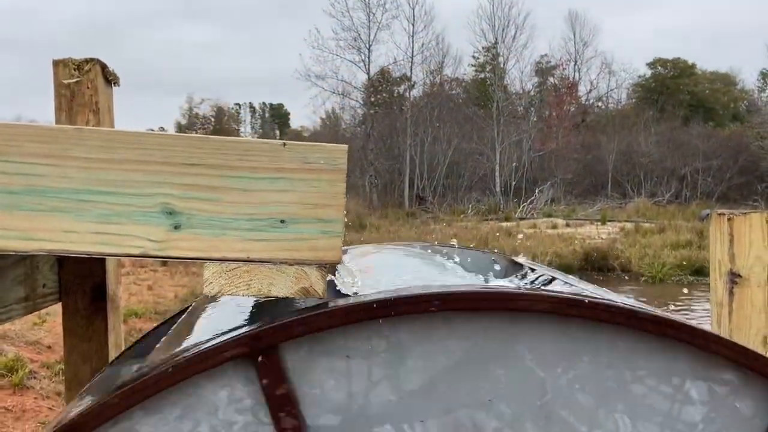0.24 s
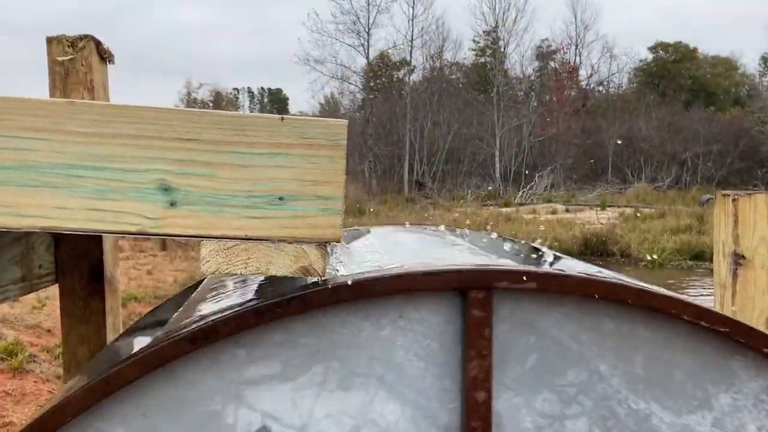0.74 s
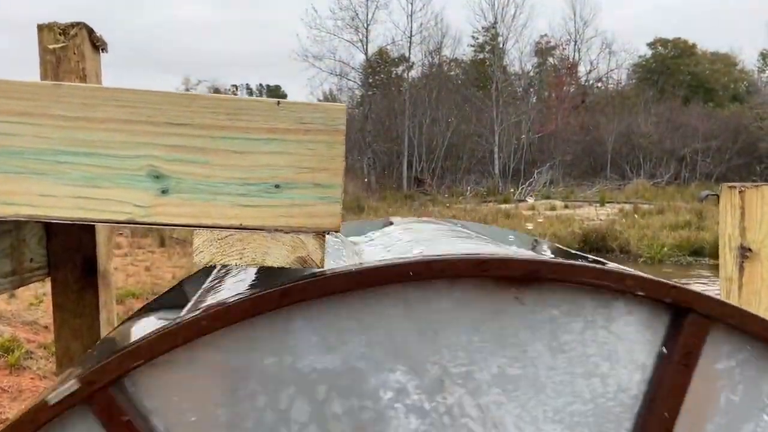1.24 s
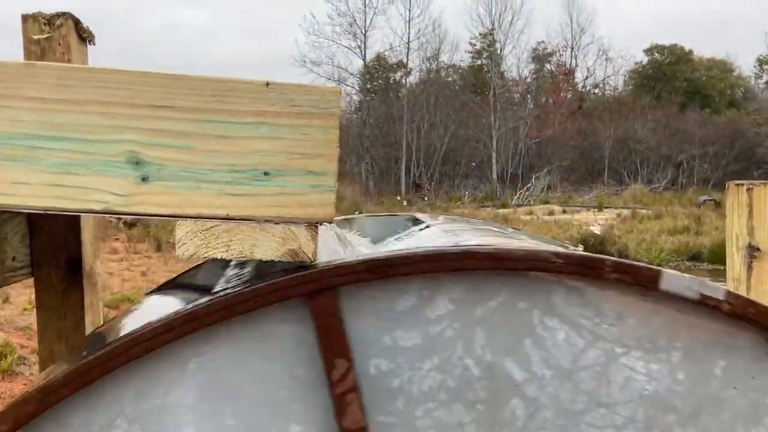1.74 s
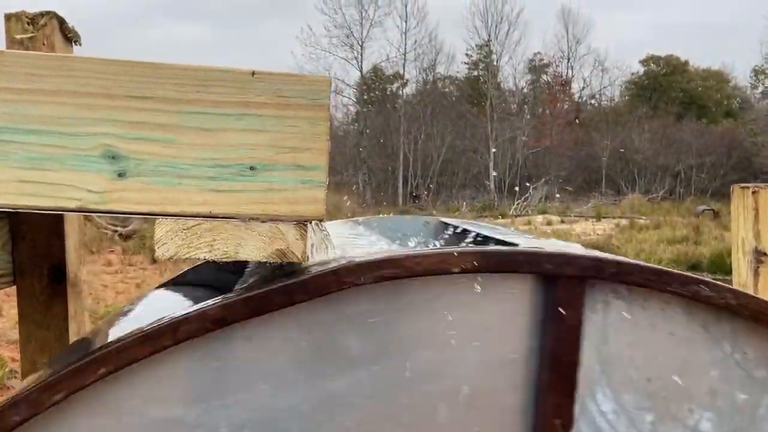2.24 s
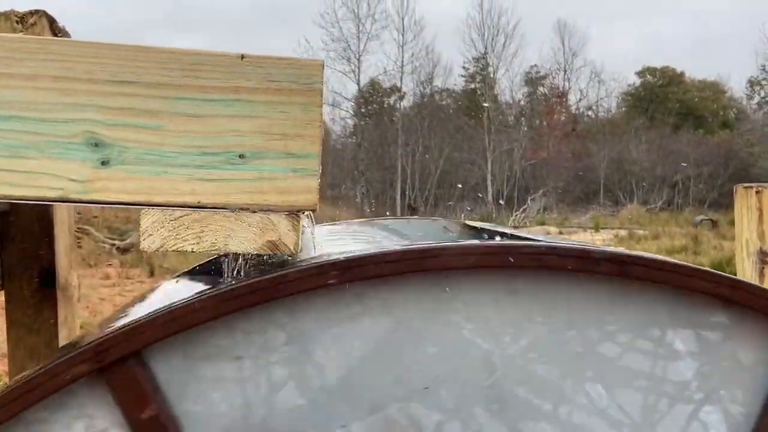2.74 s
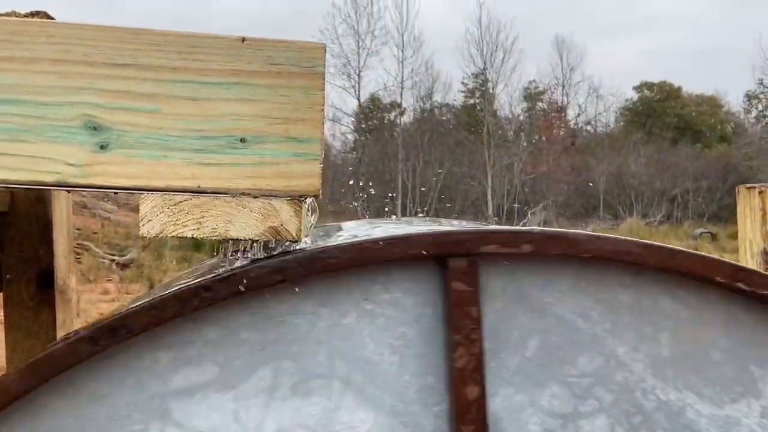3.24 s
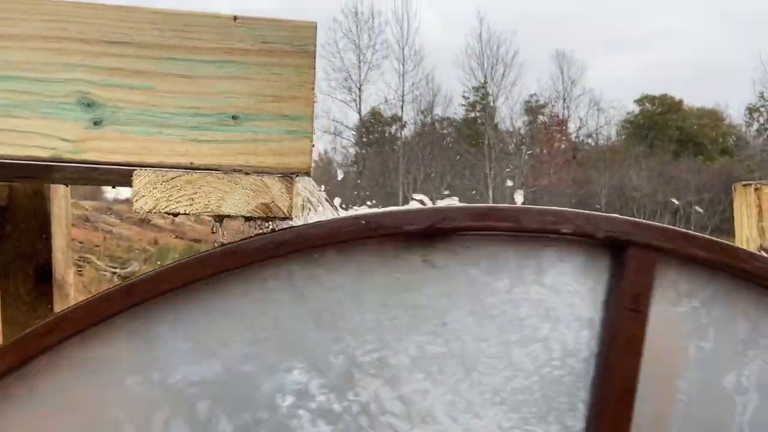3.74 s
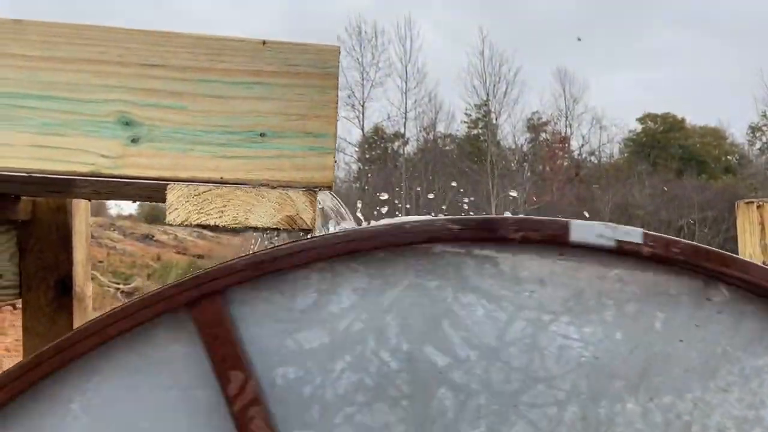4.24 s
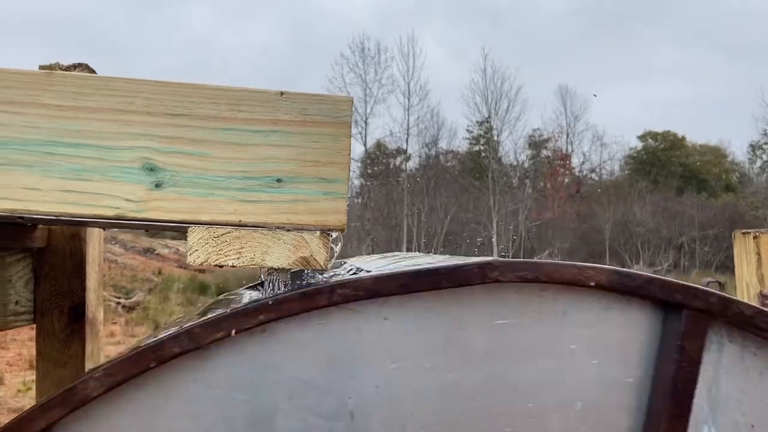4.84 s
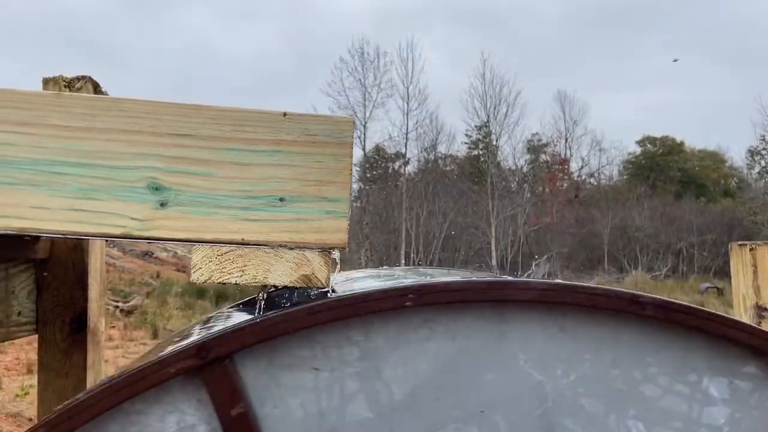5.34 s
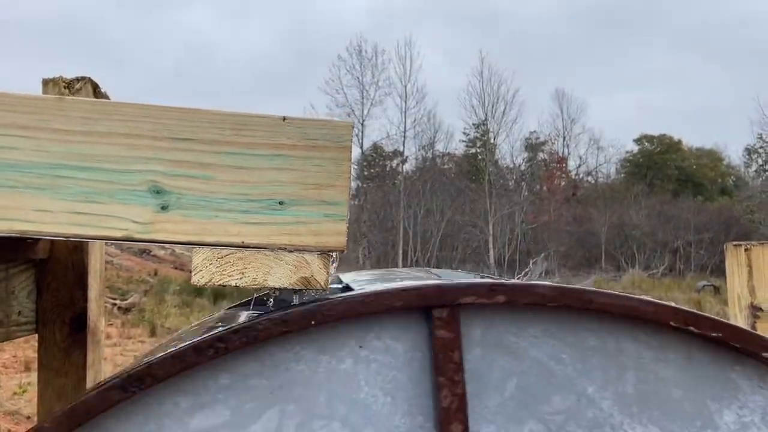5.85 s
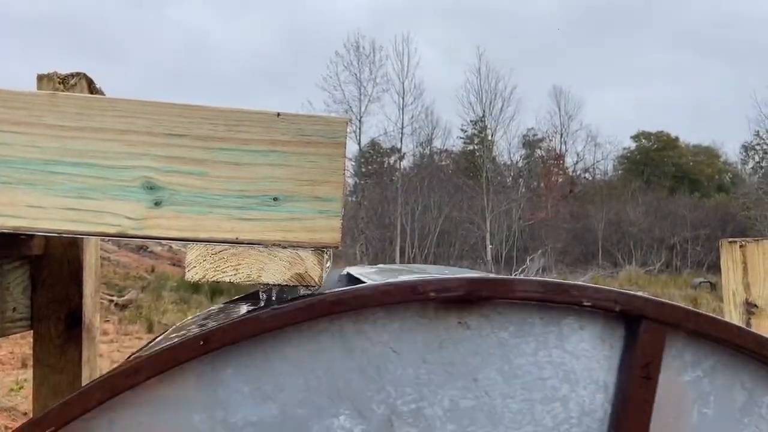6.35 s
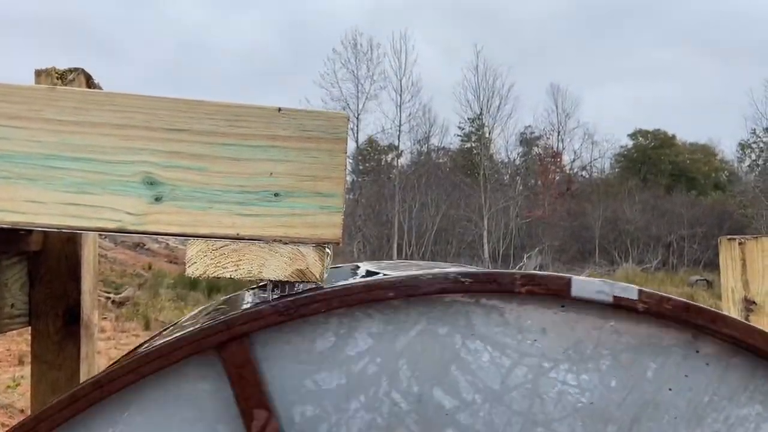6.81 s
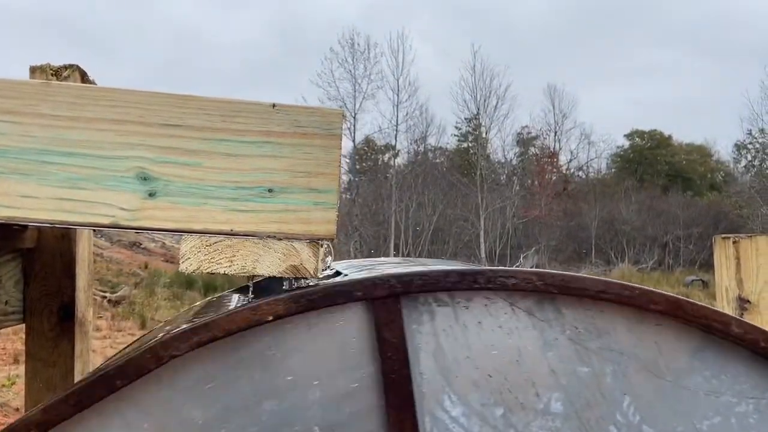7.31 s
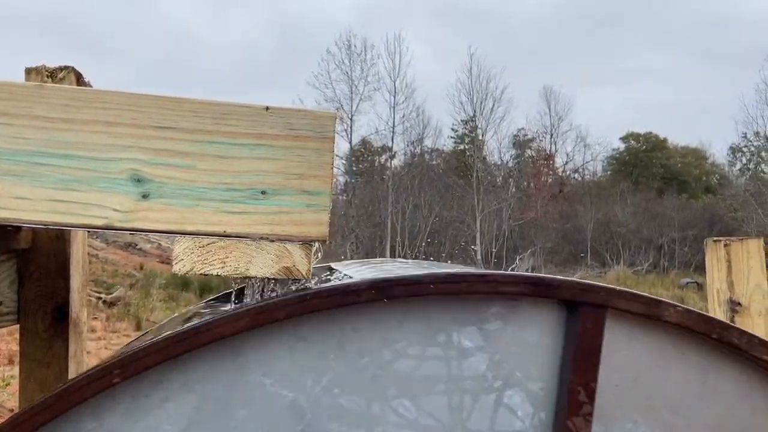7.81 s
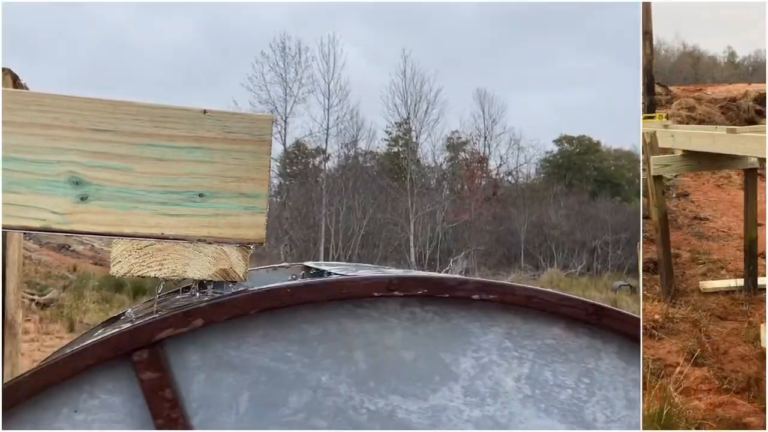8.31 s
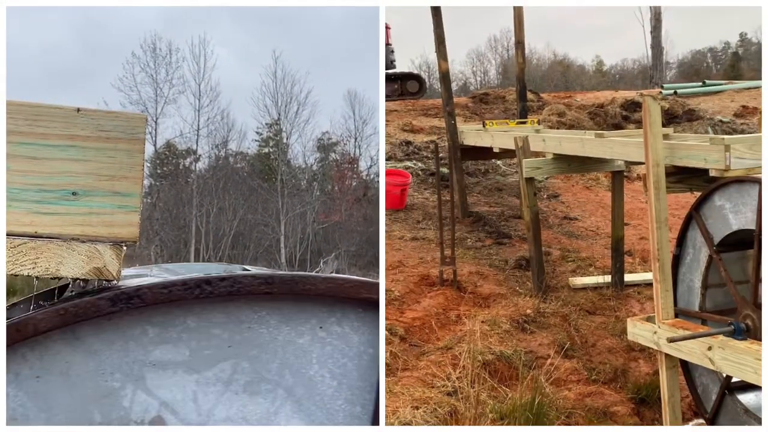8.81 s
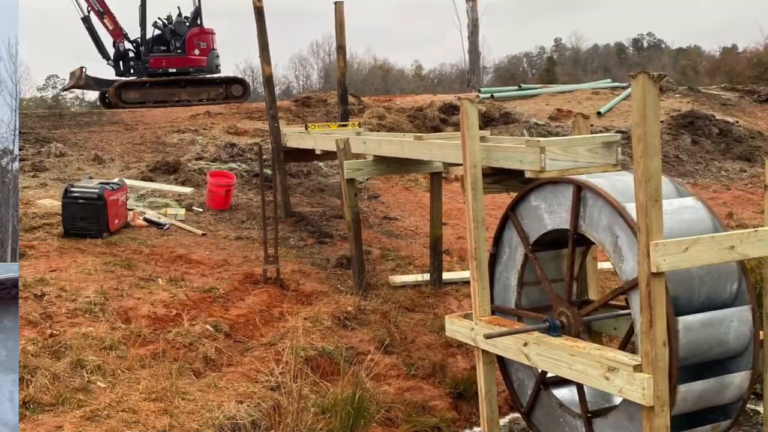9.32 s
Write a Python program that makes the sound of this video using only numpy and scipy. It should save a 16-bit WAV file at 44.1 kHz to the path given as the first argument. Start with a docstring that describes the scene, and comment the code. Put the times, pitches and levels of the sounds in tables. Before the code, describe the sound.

Outdoors, a small generator throbs and ticks at a distance while water rushes over a steel waterwheel right beside the microphones. It starts fairly quiet and keeps building. The wheel gives a quick double clack and a faint rubbing tone, then hollow gulps, sloshes and sharp splattering drops become more prominent over a fine hiss of spray, until a sudden stop.

```python
"""Steel waterwheel in a yard

Close to a wheel turning under a wooden flume: water rushes into the buckets, gulps air, thumps on the
sheet metal and throws drops that splat near the microphones. Across the yard a single-cylinder generator
hums and clatters. Heard on a small stereo pair, it all swells steadily, eases briefly and is cut off."""
import sys
import numpy as np
from scipy import signal
from scipy.fft import rfft, irfft, next_fast_len
from scipy.io import wavfile
from scipy.ndimage import map_coordinates

SR = 44100
rng = np.random.default_rng(int(sys.argv[2]) if len(sys.argv) > 2 else 0)


def log_audio(samples):
    """Write samples as a 16-bit WAV file to the path given in sys.argv[1]."""
    # one column per channel
    frames = np.atleast_2d(samples).T
    # limit to full scale, then quantise
    limited = np.clip(frames, -1, 1)
    pcm = np.round(limited * 32767).astype(np.int16)
    wavfile.write(sys.argv[1], SR, pcm)


N = 422032

# spectra of the low churn and the brighter rush under the flume: f/Hz, level/dB
CHURN_SPECTRUM = [(120, -25.5), (240, -4), (340, -2.5), (500, -6.5), (640, -8.5), (820, -10.5), (930, -3.5),
                  (1020, -8.5), (1120, -6.5), (1270, -14.5), (1650, -13.5), (2100, -12.5), (5000, -50.5)]
RUSH_SPECTRUM = [(600, 7.5), (1400, 4.5), (1850, 1.5), (2120, 2), (2700, -2), (3400, -1), (4100, -8.5),
                 (6000, -17.5), (15000, -47)]

def pouring(churn_db=-27, rush_db=-30):
    """The stream churns air into the buckets: large bubbles gurgle below a rush of small ones."""
    def between_discs(x):
        return unit(x + amp(-8) * echoed(x, t60=.08))  # reflections inside the steel wheel

    gurgle = bubbles(200, 1700, cycles=5, spread_db=2.5, rise=.04, count=7000, samples=1200)
    fizz = bubbles(1200, 6000, cycles=4, spread_db=2.4, rise=.03, count=18000, samples=200)
    fizz += amp(5) * noise()
    churn = unit(coloured(between_discs(gurgle + amp(11) * noise()), CHURN_SPECTRUM))
    rush = unit(coloured(between_discs(fizz), RUSH_SPECTRUM))
    surge = amp(churn_db + 1.026 * swell_db() + .7 * wobble(14))
    flutter = amp(rush_db + .88 * swell_db() + 1.23 * wobble(30))
    return surge * churn + flutter * rush


# spectrum of the filling buckets: f/Hz, level/dB
RUMBLE_SPECTRUM = [(18, -52), (32, -41.5), (52, -11), (85, -9.5), (130, -8.5), (200, -11.5), (270, -11),
                   (500, -41.5)]
# water slumping on a bucket's floor: t/s, relative level/dB, f/Hz
BUCKET_THUMPS = [(0.531, -33.5, 72), (0.86, -33, 84), (1.24, -29, 80), (1.502, -26.5, 72.6),
                 (2.137, -26, 81), (2.536, -25, 68), (2.699, -24.5, 74.5), (3.282, -25, 56),
                 (4.028, -22, 66), (4.188, -28, 88), (4.496, -22, 80), (4.715, -22.5, 71), (5.613, -17, 92),
                 (5.809, -26, 86), (6.23, -26.5, 81.4), (6.771, -20, 82), (7.118, -22, 92),
                 (7.607, -21, 94), (8.049, -23.5, 77)]
# air pockets closing in a bucket: t/s, relative level/dB, f/Hz, glide/share of f
AIR_GULPS = [(0.156, -23, 258, 0.11), (0.226, -23, 260, .05), (1.559, -24.5, 309, 0.13),
             (2.021, -22, 207, 0.14), (2.774, -27, 292, .2), (2.995, -23.5, 320, 0.24),
             (3.327, -24.5, 276, 0.22), (3.535, -24, 307, .25), (4.258, -19.5, 297, .1),
             (4.3, -20, 342, 0.29), (4.715, -23.5, 277, 0.019), (5.7, -15.5, 267, 0.12),
             (5.824, -17, 314, -0.098), (5.884, -12.5, 263, .25), (6.297, -14.5, 300, 0.028),
             (6.395, -10.5, 203, 0.055), (6.813, -7.5, 264, 0.07), (7.159, -19, 265, .1),
             (7.64, -18.5, 363, -0.075), (7.835, -19, 298, -0.079), (8.355, -17, 254, .1),
             (8.549, -11.5, 278, .11), (8.607, -16.5, 328, 0.08)]

def buckets(rumble_db=-30.5):
    """The sheet-metal buckets rumble as they fill, thump and gulp air; they radiate no deep bass."""
    lumps = noise() * amp(3 * wobble(14))
    rumble = amp(rumble_db + .62 * swell_db()) * unit(coloured(lumps, RUMBLE_SPECTRUM))
    thumps = plunges([(s, db, hz, 0) for s, db, hz in BUCKET_THUMPS], gain_db=-2.5, peak_s=.013, rough=.59)
    gulps = plunges(AIR_GULPS, gain_db=-1.5, peak_s=.007, rough=.45)
    return rumble + direct_only(coloured(thumps + gulps, [(28, -30), (48, -.5)]))


def plunges(events, gain_db, peak_s, rough):
    """Low, soft-edged resonances that swell and die within a few cycles."""
    track, t = np.zeros(N), np.arange(SR // 4) / SR
    age = t / peak_s
    for s, db, hz, glide in events:
        drift = np.interp(age, np.arange(40), rng.standard_normal(40))
        turns = hz * (t + glide * peak_s * (np.logaddexp(0, age - 2) - age / 2))
        envelope = amp(db + gain_db) * age * np.exp(1 - age)
        add(track, s, envelope * np.sin(2 * np.pi * turns + rough * drift))
    return track


# the fattest drops, landing close to the microphones: t/s, relative level/dB
NEAR_DROPS = [(2.1756, -30), (2.5173, -26.5), (3.253, -28), (3.312, -25.5), (3.393, -27.5), (3.5215, -23),
              (4.22, -28), (4.3655, -25), (4.5235, -20), (4.5786, -27.5), (4.8043, -21), (4.8998, -29.5),
              (4.9571, -27), (5.05, -21.5), (5.1243, -19), (5.244, -21.5), (5.3, -17.5), (5.32, -15.5),
              (5.3447, -17.5), (5.645, -25.5), (5.677, -21.5), (6.191, -27.5), (6.276, -18), (6.326, -20.5),
              (6.369, -23), (6.491, -29), (6.8376, -25), (6.8855, -24), (6.9415, -20.5), (7.0019, -20),
              (7.045, -21.5), (7.1087, -21.5), (7.1645, -17), (7.213, -21), (7.313, -24.5), (7.5887, -13.5),
              (8.133, -16.5), (8.1597, -18), (8.194, -23), (8.3409, -19.5), (8.3843, -22.5),
              (8.4402, -22.5), (8.503, -17.5), (8.5649, -24)]
# spectrum of a drop on wet steel: f/Hz, level/dB
SPLAT_SPECTRUM = [(1000, -24), (3000, -12.5), (4300, -10), (4800, -2), (6800, 2.5), (8500, -0.5),
                  (11500, 3), (13500, 0), (16000, -3)]

def splats(tail_t60=.17, steel_hz=4950, small_count=45):
    """Drops burst on wet steel, ring it and ping with tiny bubbles; smaller ones fall at random."""
    track, t = np.zeros((2, N)), np.arange(SR // 8) / SR
    onset = 1 - np.exp(-t / .0003)
    droplets = amp(-17 - 60 * t / tail_t60)  # landing just after the burst
    small_db = -28 + .6 * swell_db()
    small = [(at / SR, small_db[at] + 2 * rng.standard_normal()) for at in rng.integers(0, N, small_count)]
    for s, db in list(NEAR_DROPS) + small:
        burst = amp(-60 * t / rng.uniform(.024, .044))
        ping_hz = rng.uniform(4900, 13000, size=(4, 1))
        pings = amp(-12) * burst * np.sin(2 * np.pi * ping_hz * t).sum(axis=0)
        ring_hz = steel_hz * (1 + .049 * rng.standard_normal())
        ring = amp(-9) * np.sqrt(burst) * np.sin(2 * np.pi * ring_hz * t)
        splash = onset * (burst + droplets) * rng.standard_normal((2, len(t)))
        add(track, s, amp(db - 2) * (splash + pings + ring))
    return coloured(track, SPLAT_SPECTRUM)


# spectrum of the fine spray around the wheel: f/Hz, level/dB
SPRAY_SPECTRUM = [(2000, -5.5), (4200, 0.5), (5000, 3), (7000, -1.5), (9000, -5), (11500, -1.5),
                  (14000, -6.5), (16000, -12.5)]

def spray(level_db=-37, spread_db=10, decay_s=.0068, count=2200):
    """A fine hiss with small drops pattering and pinging through it."""
    when, chance = rng.random((count, 2)).T
    power = amp(-spread_db * np.log(np.maximum(chance, np.exp(-3)))) ** 2
    hits = np.bincount((when * (N - 1)).astype(int), power, N)
    fading_power = signal.lfilter([1], [1, -np.exp(-1 / (decay_s * SR))], hits)
    patter = unit(np.sqrt(np.abs(fading_power)))
    hiss = unit(noise() + amp(19.5) * echoed(noise(), t60=.012))
    pings = bubbles(4000, 15000, cycles=25, spread_db=2.2, rise=.005, count=5000, samples=700)
    drops = hiss + patter * noise() + amp(-8) * pings
    return amp(level_db + .55 * swell_db() + .91 * wobble(1.9)) * unit(coloured(drops, SPRAY_SPECTRUM))


# water sloshing over a bucket's lip: middle t/s, relative level/dB, f/Hz
LIP_SLOSHES = [(2.21, -37, 696), (2.8, -37, 612), (3.38, -37.5, 688), (4.08, -35.5, 739), (4.31, -39, 503),
               (4.42, -37, 576), (5.8, -35.5, 652), (5.91, -35, 725), (6.44, -32, 770), (6.58, -32.5, 613),
               (6.89, -28, 954), (7.53, -28.5, 720), (7.74, -31, 540), (7.95, -30, 873)]

def sloshes(width_s=.034, rise_oct_per_s=5, spread_oct=.22, cycles=9, count=20):
    """Each slosh frees a handful of bubbles, the deep ones first, so that it rises in pitch."""
    track, t = np.zeros((2, N)), np.arange(SR // 20) / SR
    for s, db, hz in LIP_SLOSHES:
        for late, detune, side in rng.standard_normal((count, 3)):
            delay = width_s * late
            turns = hz * 2 ** (rise_oct_per_s * delay + spread_oct * detune) * t
            age = turns / cycles
            envelope = np.exp(-age) * (1 - np.exp(-2 * turns))
            ring = envelope * np.sin(2 * np.pi * turns * (1 + .03 * age))
            add(track, s + delay, amp(db + 1.5) * np.array([[1], [side]]) * ring)
    return track


# single drips: t/s, peak level/dB, f/Hz
SINGLE_DRIPS = [(1.133, -30, 4770), (6.8627, -20.5, 6300)]

def drips(cycles=16, rise=.012):
    """A drip traps a small bubble that rings briefly, rising slightly."""
    track, t = np.zeros(N), np.arange(SR // 30) / SR
    for s, db, hz in SINGLE_DRIPS:
        age = hz * t / cycles
        add(track, s, amp(db) * np.exp(-age) * np.sin(2 * np.pi * hz * t * (1 + rise * age / 2)))
    return direct_only(track)


# sheets of spray brushing the rim: middle t/s, width/s, level/dB
RIM_SWISHES = [(3.71, 0.019, -33), (3.87, 0.03, -38.5), (4.04, 0.013, -32.5), (7.72, 0.16, -34)]

def swishes():
    """Thrown water sweeps softly across the rim."""
    envelope = sum(amp(db) * hump(s, width) for s, width, db in RIM_SWISHES)
    return envelope * unit(coloured(noise(), [(1800, -54), (2500, 8), (3900, 7), (5500, 4.5), (12000, -1)]))


# a double clack on the wheel and its weak rebound: t/s, relative level/dB
WHEEL_KNOCKS = [(2.008, -20.5), (2.022, -25), (2.125, -30)]
# modes of the wheel's steel: f/Hz, relative level/dB, t60/s
STEEL_MODES = [(484, 6.5, .07), (1130, -2, .1), (1400, -2.5, .12), (1723, 4.5, .11), (2105, -2.5, .1),
               (2280, -1, .11), (2556, 4, .08), (2790, -1.5, .12), (3100, -3, .08), (3300, -8.5, .08),
               (3747, -1.5, .14), (3962, -5.5, .11), (4667, 1.5, .12), (4850, -3.5, .045)]

def clack(crack_t60=.099):
    """Each knock on the wet wheel cracks and rings its steel briefly."""
    ring, crack, t = np.zeros((2, N)), np.zeros((2, N)), np.arange(SR // 5) / SR
    for s, db in WHEEL_KNOCKS:
        modes = sum(amp(level - 60 * t / t60) * np.sin(2 * np.pi * (hz * t + rng.random((2, 1))))
                    for hz, level, t60 in STEEL_MODES)
        add(ring, s, amp(db - 14.5) * modes)
        add(crack, s, amp(db - 5 - 60 * t / crack_t60) * rng.standard_normal((2, len(t))))
    crack_spectrum = [(250, -10), (500, 4.5), (2600, 9), (4700, -15.5), (5600, -4), (12000, -17)]
    return ring + coloured(crack, crack_spectrum)


# the rim rubbing: middle t/s, length/s, peak level/dB, f/Hz
RIM_RUBS = [(2.44, 0.77, -44, 1530), (3.0, 0.82, -43, 1380)]

def rub(waver_rad=.83):
    """The wet rim sings faintly and unsteadily; each rub fades in and out."""
    t, tone = np.arange(N) / SR, np.zeros(N)
    waver = waver_rad * wobble(150)
    for s, length, db, hz in RIM_RUBS:
        arch = np.maximum(1 - (2 * (t - s) / length) ** 2, 0)
        tone += amp(db) * arch * np.sin(2 * np.pi * hz * t + waver)
    return np.array([np.zeros(N), tone])  # scattered sound only


# the generator across the yard sags under load and recovers: t/s, firing rate/Hz
FIRING_RATE = [(0, 25.97), (.31, 26.01), (.48, 25.35), (.98, 25.85), (1.36, 25.68), (2.61, 26.04),
               (3.09, 25.56), (3.5, 25.63), (4.12, 24.45), (4.55, 25.77), (4.81, 26.31), (5.39, 26.13),
               (5.8, 25.09), (6.44, 25.69), (6.7, 25.61), (7.21, 26.77), (7.97, 26.11), (8.6, 26.28)]
# when each of the two valves shuts: phase/cycles
VALVE_PHASES = [.2, .76]
# spectrum of the engine's casing: f/Hz, level/dB
CASING_SPECTRUM = [(250, -15.5), (400, 5), (500, -8), (800, -5.5), (930, 4), (1020, -2), (1110, 3.5),
                   (1250, -7.5), (1800, -7.5), (2150, -6), (2700, -6.5), (4000, -18), (9000, -29)]

def generator(valves_db=-34, tick_t60=.034):
    """The exhaust hums while the valves tick on the casing, alike in the lows, ever new in the treble."""
    rate, = curves(FIRING_RATE)
    cycle, ticks = np.cumsum(rate) / SR, np.zeros((2, N))
    for phase in VALVE_PHASES:
        shuts = np.diff(np.ceil(cycle - phase), prepend=0)[None]
        age = (cycle - phase) % 1 / rate
        ring = unit(np.vstack([echoed(shuts, tick_t60), echoed(shuts, tick_t60)]))
        rasp = unit(noise() * amp(-60 * age / tick_t60))
        ticks += coloured(ring, [(1100, 5), (1600, -9.5)]) + rasp
    clatter = amp(valves_db) * unit(coloured(ticks, CASING_SPECTRUM))
    return amp(swell_db()) * (direct_only(exhaust(rate)) + clatter)


# the exhaust's hum: harmonic number, level/dB at the crest and at cruise, dB per Hz of extra firing rate
EXHAUST_HARMONICS = [(3, -40, .5), (5, -28, 6.5), (6, -25.5, 3.5), (7, -25.8, 1), (8, -28, -2),
                     (9, -42, -1), (10, -35, -1), (11, -44, 0), (13, -44, 0), (15, -43, -2),
                     (16, -39.5, -0.5), (35, -47, 0), (37, -49, 0)]
# the muffler's narrow resonance: f/Hz, width/Hz
MUFFLER_RESONANCE = (138, 6)
# the engine labours and harmonics 8-10 groan out: middle t/s, width/s, boost/dB
ENGINE_LABOURS = [(4.0, .27, 4), (6.35, 0.62, 1)]

def exhaust(rate, cruise_hz=26, puff_phase=.255, wander_cycles=.025):
    """One puff per firing leaves the muffler as a throbbing hum; tones above its resonance lag."""
    cycle, hum = np.cumsum(rate) / SR - puff_phase, np.zeros(N)
    muffler_hz, muffler_width = MUFFLER_RESONANCE
    labour_db = sum(db * hump(s, width) for s, width, db in ENGINE_LABOURS)
    for k, db, db_per_hz in EXHAUST_HARMONICS:
        lag = np.arctan2(k * rate * muffler_width, muffler_hz ** 2 - (k * rate) ** 2)
        level = db + db_per_hz * (rate - cruise_hz) + labour_db * (7 < k < 11) + wobble(3)
        turns = k * cycle + wander_cycles * wobble(2)
        hum += amp(level) * np.sqrt(2) * np.cos(2 * np.pi * turns - lag)
    return hum


def swell_db(crest_s=8.115, climb_db_per_s=2, ease_db_per_s=6.5):
    """A steady climb to 0 dB at the crest, then an easing; water and engine follow it by varying amounts."""
    after = np.arange(N) / SR - crest_s
    return np.minimum(climb_db_per_s * after, -ease_db_per_s * after)


def bubbles(lo_hz, hi_hz, cycles, spread_db, rise, count, samples):
    """Two streams of bubbles: damped, rising tones at random times, pitches and strengths; rms 1."""
    when, pitch, chance = rng.random((count, 3)).T[:, :, None]
    hz = lo_hz + (hi_hz - lo_hz) * pitch
    turns = hz * np.arange(samples) / SR
    age = turns / cycles
    strength = amp(-spread_db * np.log(np.maximum(chance, np.exp(-4)))) * np.sqrt(hz)
    envelope = strength * np.exp(-age) * (1 - np.exp(-2 * turns))
    tones = envelope * np.sin(2 * np.pi * turns * (1 + rise * age / 2))
    at = (when * (2 * N - samples)).astype(int) + np.arange(samples)
    return unit(np.bincount(at.ravel(), tones.ravel(), 2 * N).reshape(2, N))


def echoed(x, t60):
    """x heard through a dying cloud of reflections with energy 1."""
    t = np.arange(SR // 8) / SR
    cloud = rng.standard_normal(len(t)) * amp(-60 * t / t60)
    cloud /= np.linalg.norm(cloud)
    return signal.fftconvolve(x, cloud[None], axes=1)[:, :N]


def amp(db):
    """Decibels as amplitude."""
    return 10 ** (np.asarray(db) / 20)


def unit(x):
    """x at rms 1."""
    return x / np.sqrt(np.mean(x ** 2) + 1e-20)


def curves(rows):
    """One value per sample for each column after the time."""
    s, *cols = np.transpose(rows)
    return [np.interp(np.arange(N) / SR, s, c) for c in cols]


def hump(s, width):
    """A smooth rise and fall of height 1 around time s."""
    return np.exp(-.5 * ((np.arange(N) / SR - s) / width) ** 2)


def wobble(rate):
    """A smooth random curve, rate knots a second."""
    knots = rng.standard_normal(int(N * rate / SR) + 4)
    return map_coordinates(knots, [np.arange(N) * rate / SR], order=2)


def filtered(x, response):
    """x times a complex response of frequency."""
    m = next_fast_len(N + SR // 4)
    return irfft(rfft(x, m) * response(np.fft.rfftfreq(m, 1 / SR)), m)[..., :N]


def coloured(x, spectrum):
    """x shaped by (f/Hz, level/dB) points on a log axis."""
    f, db = np.transpose(spectrum)
    return filtered(x, lambda hz: amp(np.interp(np.log(hz + 1), np.log(f), db)))


def noise():
    """Two unrelated white noises: direct and scattered sound."""
    return rng.standard_normal((2, N))


def direct_only(x):
    """x as direct sound, with nothing scattered."""
    return np.array([x, np.zeros(N)])


def add(track, s, sound):
    """Mix a sound into the track at time s."""
    part = track[..., max(round(s * SR), 0):][..., :sound.shape[-1]]
    part += sound[..., :part.shape[-1]]


# the small stereo pair by the wheel: f/Hz, left-right likeness (0-1), lead of the left side/rad
MICROPHONE_PAIR = [(0, .995, 0), (200, .98, .4), (400, .75, .9), (1750, .65, 3.3), (2600, .72, 6.2),
                   (3500, .62, 7.8), (4150, .2, 6.2), (5900, .25, 5.5), (6500, .72, 6.4), (7900, .68, 5),
                   (8900, .97, 3.1), (10100, .75, 1.2), (11200, .97, 0), (12400, .75, -1.7),
                   (13200, .97, -3.1), (14300, .7, -5.2), (15400, .97, -6.3)]

def microphones(direct, scattered, left_db=.8, left_below_hz=700):
    """Likeness and lag between the two microphones depend on frequency; the bass leans left."""
    f, likeness, lead = np.transpose(MICROPHONE_PAIR)
    sides = np.array([[1], [-1]])

    def spread(hz):
        return np.arccos(np.clip(np.interp(hz, f, likeness), 0, 1)) / 2

    def pickup(hz):
        lean = amp(sides * left_db / (1 + (hz / left_below_hz) ** 2))
        return lean * np.exp(.5j * sides * np.interp(hz, f, lead))

    mid = filtered(direct, lambda hz: np.cos(spread(hz)) * pickup(hz))
    side = filtered(scattered, lambda hz: sides * np.sin(spread(hz)) * pickup(hz))
    return mid + side


def scene():
    """The generator across the yard and the wheel close by, at the stereo pair."""
    engine = generator()
    water = pouring() + sloshes() + drips() + spray() + swishes() + splats()
    wheel = buckets() + clack() + rub()
    direct, scattered = engine + water + wheel
    return microphones(direct, scattered)


def record(dry, end_s=8.634, top_hz=15950):
    """The sound is cut off abruptly; nothing is kept above the band limit."""
    gate = np.clip((end_s - np.arange(N) / SR) / .004 + 1, 0, 1)
    return filtered(dry * gate, lambda hz: np.clip((top_hz - hz) / 100 + .5, 0, 1))


dry = scene()
out = record(dry)
log_audio(out)
```